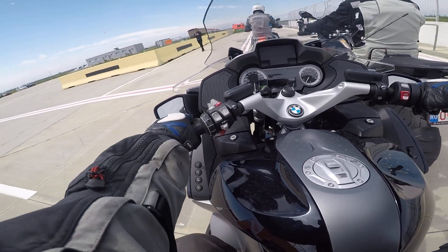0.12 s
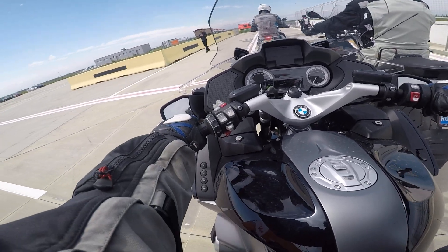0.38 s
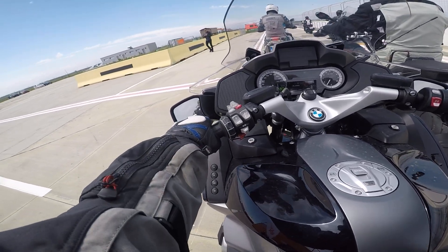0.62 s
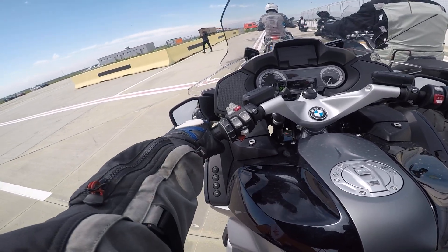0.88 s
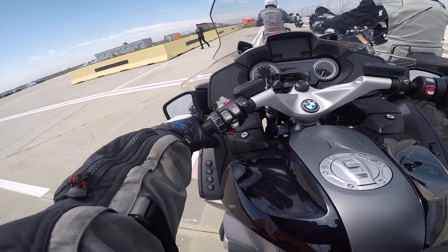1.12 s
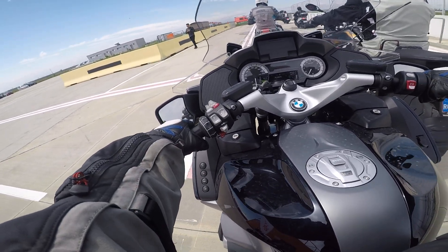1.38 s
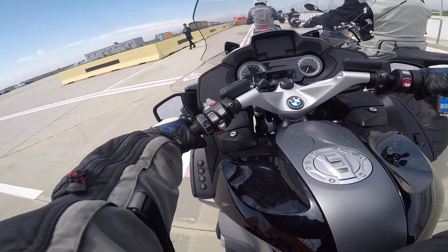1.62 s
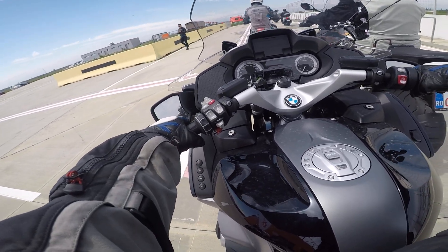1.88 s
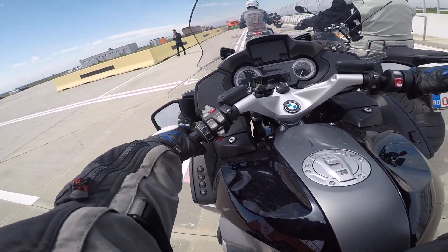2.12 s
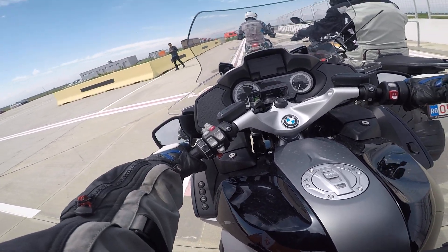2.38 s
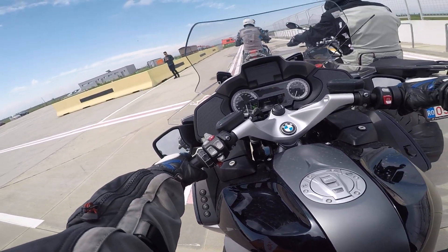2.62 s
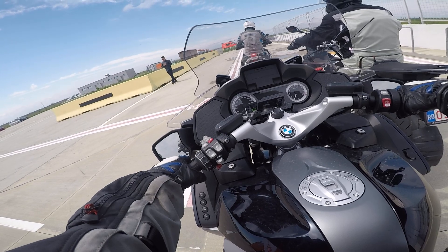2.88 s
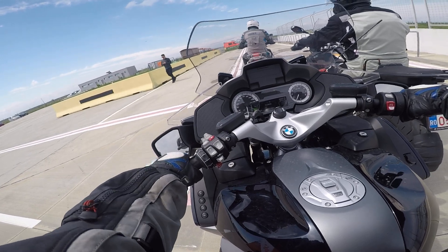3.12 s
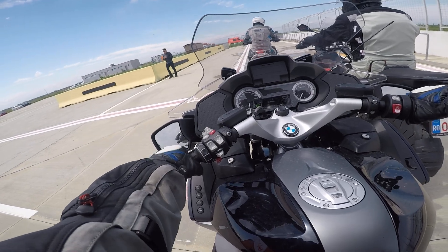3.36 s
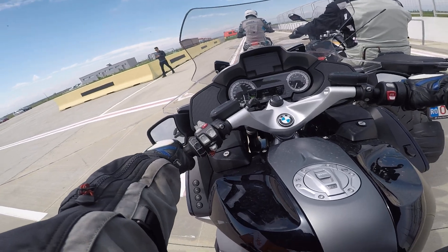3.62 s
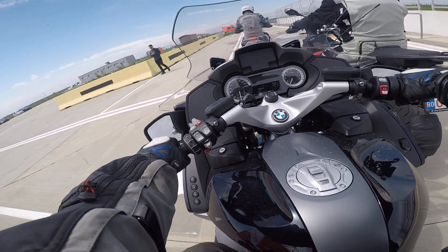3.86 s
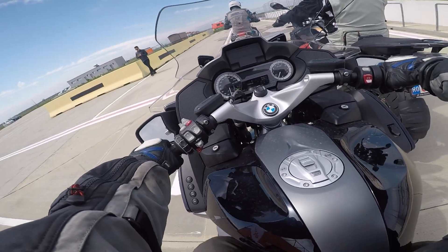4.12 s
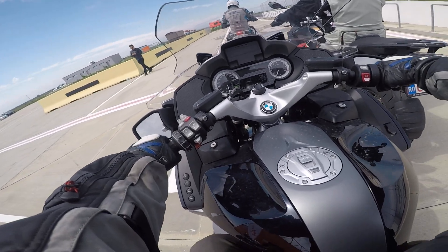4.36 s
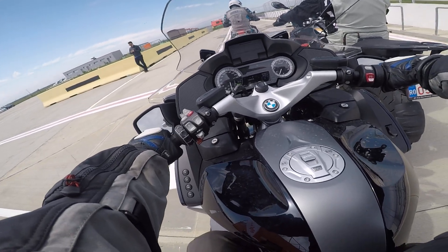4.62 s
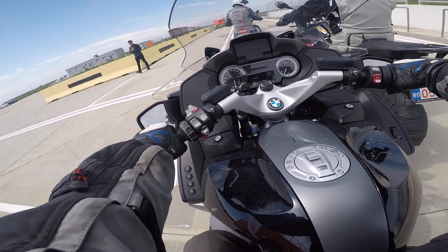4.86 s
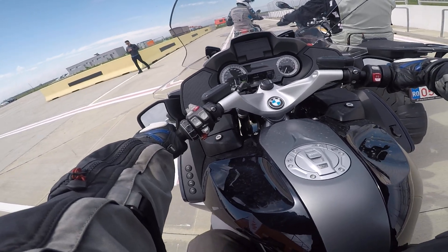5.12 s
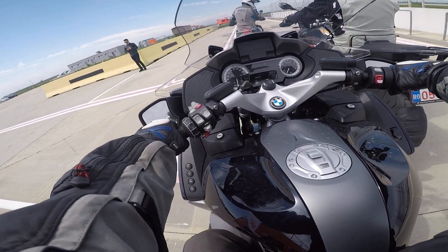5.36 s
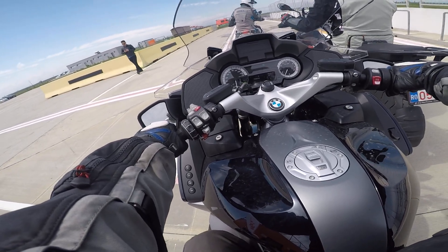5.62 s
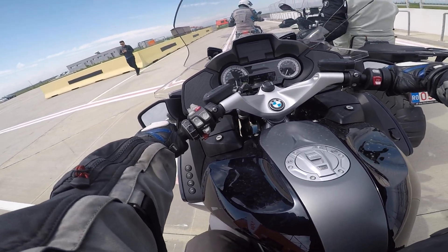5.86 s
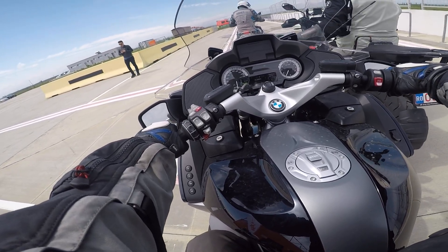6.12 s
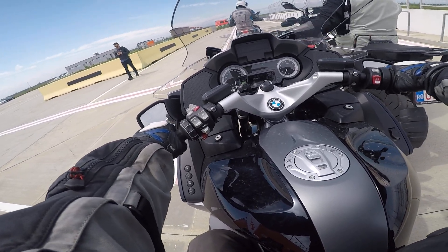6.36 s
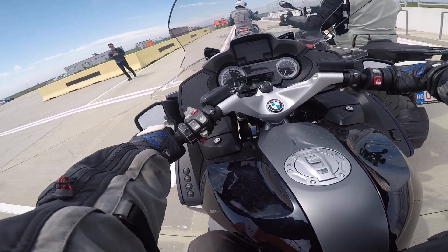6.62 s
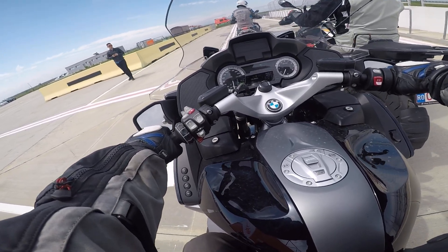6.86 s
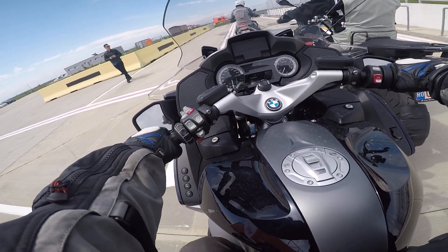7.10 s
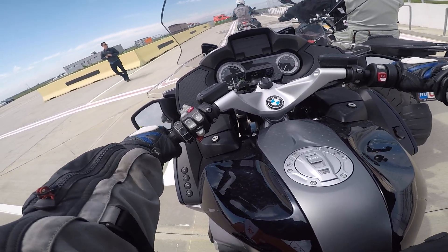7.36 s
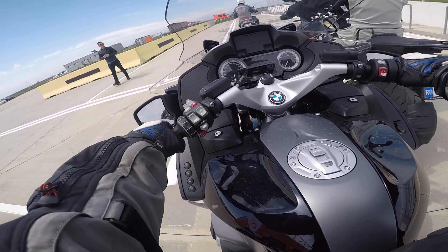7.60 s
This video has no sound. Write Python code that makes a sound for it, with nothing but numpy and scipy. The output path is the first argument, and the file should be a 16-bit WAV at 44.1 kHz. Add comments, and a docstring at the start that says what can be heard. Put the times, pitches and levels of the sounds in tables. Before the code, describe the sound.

Outdoors on a wide open apron, motorcycles idle in a queue around a chest-worn stereo microphone. A dense low chug dominates. Early on, metal scrapes and sharp lever clacks cut through; a neighbouring engine then blips gently and drops to a slower idle. Later a loose part rattles in a quick dying burst and a panel begins to buzz faintly. Far engines glide upward underneath, over a low rumble.

```python
"""The rider's own twin idles evenly: regular firing impulses excite its exhaust pipe and shake its casing.
Motorcycles wait in a queue around it on a wide apron, heard at two microphone ports on the rider's chest.
By the same principle a neighbour's engine lopes, blips and settles and a third idles ahead; a panel buzzes
as a modulated tone, a lever clacks and scrapes in its modes, and a loose part rattles in noise bursts.
Gliding tones are far machines, most winding up, over a crowd of shaped noise; gain control evens the level."""
import sys
import numpy as np
from scipy import signal
from scipy.fft import rfft, irfft, next_fast_len
from scipy.io import wavfile
from scipy.ndimage import uniform_filter1d, map_coordinates

SR = 44100
rng = np.random.default_rng(int(sys.argv[2]) if len(sys.argv) > 2 else 0)


def wav_record(signal):
    """Record a signal, one row per channel, as 16-bit PCM in the file named by sys.argv[1]."""
    frames = np.transpose(np.atleast_2d(signal))
    bounded = np.clip(frames, -1, 1)
    # unit amplitude maps onto the largest positive 16-bit level
    quanta = np.round(bounded * 32767).astype(np.int16)
    wavfile.write(sys.argv[1], SR, quanta)


def rack_gain(trim_db):
    """Turn a fader trim in dB into the linear factor to multiply a signal by."""
    fader = np.asarray(trim_db, float)
    return 10 ** (fader / 20)


N = 340893
TIME = np.arange(N) / SR  # s

# the neighbour's speed: fast idle, a sag, a blip, then down to slow idle: t/s, firing rate/Hz
NEIGHBOUR_RATE = [(0, 29.6), (.95, 29.1), (1.42, 26.8), (1.8, 29.45), (3.05, 28.8), (4.07, 31.6),
                  (4.27, 29.85), (4.68, 24.3), (4.9, 23), (5.3, 21.6), (5.7, 21.05), (7.73, 21.2)]


def own_engine():
    """Quasi-periodic excitation: a twin at idle fires almost evenly while its speed hunts slowly."""
    # exhaust pipe response: f/Hz, relative level/dB
    pipe = [(10, -45), (18, -19), (35, -4), (52, -15), (70, -7), (88, 0), (105, -5), (140, -10), (175, -6),
            (250, -16), (400, -26), (700, -40), (1500, -52), (6000, -80)]
    rate = 17.47 + 0.04 * wobble(1)  # firings per s
    drift_db = 2.5 * wobble(1.04)
    return engine(rate, -22.5 + drift_db, -39.5 + drift_db, pipe,
                  jitter=0.0003, scatter_db=0.8, uneven_db=1.1, burst=0.012)


def neighbour_engine():
    """Source and filter: the firing rate moves as the engine blips and settles, the pipe response stays."""
    # t/s, exhaust level/dB, clatter level/dB
    levels = [(0, -13.5, -33), (1.3, -14.5, -32.5), (1.6, -15, -51), (3, -20, -33.5), (3.8, -16.5, -38),
              (5.2, -15.5, -36.5), (7.73, -15.5, -34)]
    # exhaust pipe response: f/Hz, relative level/dB
    pipe = [(10, -56.5), (22, -33), (30, -25), (42, 0.5), (60, -5.5), (86, 3.5), (118, -3.5), (150, -6.5),
            (200, -11.5), (280, -19), (400, -25), (700, -44), (1500, -39.5), (6000, -70.5)]
    return engine(*curves(NEIGHBOUR_RATE), *curves(levels), pipe,
                  jitter=0.0004, scatter_db=1.2, uneven_db=1.1, burst=0.0065)


def third_engine():
    """Faster excitation: a four-cylinder engine up the queue, whose closer firings sound smoother."""
    # t/s, firing rate/Hz
    rate = [(0, 38.5), (1.6, 39.4), (2.5, 41.7), (7.73, 41.8)]
    # it takes load for a while: t/s, exhaust level/dB
    exhaust_level = [(0, -34), (1.7, -32), (2.4, -21.5), (3.3, -25), (3.8, -25.5), (7.73, -38)]
    # exhaust pipe response: f/Hz, relative level/dB
    pipe = [(10, -32), (40, 3), (80, -5), (120, -1.5), (165, -2), (250, -12.5), (400, -25.5), (700, -31.5),
            (6000, -76)]
    return engine(*curves(rate), *curves(exhaust_level), -48, pipe,
                  jitter=0.0006, scatter_db=1.5, uneven_db=2, burst=0.006)


def engine(rate, exhaust_db, clatter_db, pipe, jitter, scatter_db, uneven_db, burst):
    """Impulse excitation: firings drive the pipe and gate casing noise. Rows: direct, scattered."""
    spikes = firings(rate, jitter, scatter_db, uneven_db)
    exhaust = -unit(filtered(spikes, causal(pipe)))
    # each firing shakes the casing for a moment; burst is the time constant in s
    shake = filtered(spikes, lambda hz: 1 / (1 + 2j * np.pi * hz * burst) ** 2)
    clatter = unit(filtered(shake * rng.standard_normal((2, N)), casing))
    return rack_gain(exhaust_db) * exhaust + rack_gain(clatter_db) * clatter


def firings(rate, jitter, scatter_db, uneven_db):
    """Phase accumulation: a spike at each whole cycle, with random timing (jitter in s) and strength."""
    fired = np.flatnonzero(np.diff(np.floor(np.cumsum(rate) / SR)))
    luck = rng.standard_normal((400, 2))[:len(fired)]
    shift = np.round(jitter * SR * luck[:, 0]).astype(int)
    fired = np.clip(fired + shift, 0, N - 1)
    alternate = (-1) ** np.arange(len(fired))  # every second firing is weaker
    size = rack_gain(scatter_db * luck[:, 1] + uneven_db * alternate)
    return np.bincount(fired, size, N)


def casing(hz):
    """Resonance: narrow casing peaks stand on the broad colour of valve gear and casing noise."""
    # broad colour: f/Hz, relative level/dB
    broad = [(290, -14), (500, -3), (665, -8.5), (935, -9), (1020, -5.5), (1170, -10.5), (1610, -7.5),
             (1880, -13), (3770, -15.5), (4740, -20.5), (5950, -19), (7680, -25), (8250, -29),
             (12500, -42.5), (15000, -37)]
    # resonances on top of it: f/Hz, half-width/Hz, level over the broad colour/dB
    peaks = [(1007, 51, -14), (1706, 150, -6.5), (6480, 860, -6)]
    boost = sum(rack_gain(db) / (1 + ((hz - c) / w) ** 2) for c, w, db in peaks)
    return rack_gain(along(broad, hz)) * (1 + boost)


def buzz():
    """Forced vibration: the neighbour's firings modulate a panel's noisy tone in pitch and level."""
    # t/s, level/dB
    buzz_level = [(6.5, -52), (7.2, -44), (7.45, -46), (7.73, -44)]
    turns = np.pi * np.cumsum(curves(NEIGHBOUR_RATE)[0]) / SR  # one cycle per two firings
    turns = turns - turns[round(7.215 * SR)]  # a strong chirp falls at this second
    swell = unit(rack_gain(5 * np.cos(2 * turns) + 2 * np.cos(turns)))  # every second swell is larger
    hz = 3670 + 120 * np.sin(2 * turns) + 70 * wobble(4.2)  # pitch rises through each swell
    smooth = uniform_filter1d(rng.standard_normal((2, N)), size=150)
    fuzz = unit(uniform_filter1d(smooth, size=150))
    fade_in = np.clip((TIME - buzz_level[0][0]) / 0.4, 0, 1)
    tone = np.sqrt(2) * np.sin(2 * np.pi * np.cumsum(hz) / SR)
    return rack_gain(curves(buzz_level)[0]) * fade_in * swell * fuzz * tone


def clacks():
    """Modal impact: a lever rings in its damped modes with a noise crack on its front."""
    # t/s, level/dB, ring decay time t60/s, crack over ring/dB
    hits = [(1.397, -13, .029, -12), (1.4187, -21, .019, -15), (1.453, -8.5, .008, 2),
            (1.5042, -10, .0075, -2), (1.529, -22, .0073, 3)]
    # modes of the lever: f/Hz, relative level/dB
    lever = [(1350, -1), (1540, 6), (1850, -4), (2600, -6), (3900, -13)]
    total, t = np.zeros(N), np.arange(SR // 5) / SR
    for s, db, t60, crack_db in hits:
        modes = sum(rack_gain(level) * np.sin(2 * np.pi * hz * t) for hz, level in lever)
        ring = modes * rack_gain(-60 * t / max(t60, 0.005)) * (1 - np.exp(-t / 0.001))
        grit = uniform_filter1d(uniform_filter1d(rng.standard_normal(len(t)), size=5), size=5)
        band = grit - uniform_filter1d(grit, size=22)
        crack = rack_gain(crack_db - 60 * t / 0.029) * band
        total[round(s * SR):][:len(t)] += rack_gain(db) * (ring + crack)
    return total


def scrapes():
    """Friction excitation: grainy noise, fading through each stroke, drives a metal part's modes."""
    # t/s at start, t/s at end, level/dB
    strokes = [(1.125, 1.165, -42), (1.25, 1.325, -30), (1.392, 1.445, -30), (1.47, 1.485, -37)]
    # modes of the part: f/Hz, width/Hz, relative level/dB
    resonances = [(1320, 79, -6), (1570, 150, -2), (2550, 54, 0.5), (3200, 160, 1), (4800, 250, -4),
                  (6100, 220, -1.5), (7750, 200, -7.5), (8760, 180, -6), (4500, 2300, -17)]
    force = np.zeros(N)
    for start, end, db in strokes:
        fade_db = 5 * (TIME - start).clip(0, 1) / (end - start)
        gate = np.clip(np.minimum(TIME - start, end - TIME) / 0.007, 0, 1)
        force += rack_gain(db - fade_db) * gate

    def modes(f):
        return sum((-1) ** k * rack_gain(db) * 1j * f * w / (c * c - f * f + 1j * f * w)
                   for k, (c, w, db) in enumerate(resonances))
    grains = rng.standard_normal((2, N)) * rack_gain(1.4 * wobble(300))
    return force * unit(filtered(grains, modes))


def rattles():
    """Repeated contact: bursts of uneven noise from a loose part start at once and die away."""
    # t/s, bright level/dB, body level/dB, decay length/s
    bursts = [(6.4795, -20.5, -23, .02), (6.564, -26, -23, .024), (6.654, -32, -33, .016),
              (6.69, -37, -31, .012), (6.75, -38, -35, .014), (6.798, -35, -35, .012),
              (6.849, -45, -38, .014)]
    # bright colour: f/Hz, relative level/dB
    bright_tone = [(350, -36), (600, -1), (1200, -16), (2240, -8), (2600, -18), (3930, -7), (4930, -15.5),
                   (6330, -6), (8030, -24), (12000, -44), (15600, -76), (22000, -120)]
    # dull body colour: f/Hz, relative level/dB
    body_tone = [(200, -27), (400, 5), (800, -1), (1500, -6), (2800, -3), (4500, -35), (9000, -54),
                 (22000, -100)]
    bright, body = np.zeros((2, N))
    for s, bright_db, body_db, length in bursts:
        u = (TIME - s) / max(length, 0.004)
        force = np.clip(u / 0.065, 0, 1) * np.exp(-np.clip(u, 0, 5) ** 2)
        bright = bright + rack_gain(bright_db) * force
        body = body + rack_gain(body_db) * force
    contacts = rng.standard_normal((2, 2, N)) * rack_gain(2.1 * wobble(500))
    bright_noise = unit(filtered(contacts[0], causal(bright_tone)))
    body_noise = unit(filtered(contacts[1], causal(body_tone)))
    return bright * bright_noise + body * body_noise


def far_engines():
    """Frequency glide: each far engine is one exhaust tone, most of them rising as they wind up."""
    # one machine pulling away along the track, its strongest exhaust tone: t/s, f/Hz, level/dB
    away = [(2.15, 369, -36), (2.9, 385, -38), (3.15, 397, -33), (3.6, 418, -41), (4.0, 435, -37),
            (4.4, 463, -44), (4.9, 507, -39), (5.15, 530, -39), (5.4, 540, -47)]
    # others: t/s at start, t/s at end, f/Hz at start, f/Hz at middle, f/Hz at end, greatest level/dB
    tones = [(0.097, 0.648, 429, 440, 456, -33.5), (0.193, 0.702, 453, 478.6, 487, -37.5),
             (0.295, 1.701, 360, 380, 398, -38), (0.554, 1.1, 424.5, 437, 435, -32.5),
             (1.693, 2.497, 441, 457.4, 474.5, -36.5), (2.292, 3.6, 394, 413.3, 444.7, -37.5),
             (2.393, 3.2, 350.5, 361.6, 371, -38), (3.198, 3.7, 351, 349, 351, -35.5),
             (3.949, 5.602, 342, 374, 357.8, -33.5), (4.198, 5.502, 310.7, 337.3, 363, -34),
             (4.7, 5.35, 323, 327.4, 331, -37), (5.41, 5.9, 449, 437, 417, -45),
             (6.349, 7.591, 340, 363.6, 390, -37), (6.595, 7.7, 399.4, 414, 441, -39.5)]
    total = glide(away[0][0], away[-1][0], *curves(away))
    for start, end, first, middle, last, db in tones:
        u = np.clip(2 * (TIME - start) / (end - start) - 1, -1, 1)  # -1 at start, 1 at end
        bend = (first + last) / 2 - middle
        hz = middle + u * (last - first) / 2 + u ** 2 * bend
        total += glide(start, end, hz, db - 2 * (u + 0.3) ** 2)  # loudest a little before halfway
    return total


def glide(start, end, hz, db):
    """Propagation through moving air: level and phase of an exhaust tone flutter between its fades."""
    heard = np.clip(np.minimum(TIME - start, end - TIME) / 0.089, 0, 1)
    phase = 2 * np.pi * np.cumsum(hz) / SR + 0.38 * wobble(9.9)
    return heard * rack_gain(db + 2 * wobble(5)) * np.sqrt(2) * np.sin(phase)


def crowd():
    """Incoherent sum: engines too many and far to tell apart become noise. Rows: direct, scattered."""
    # engines and traffic, slowly thinning out: t/s, rumble level/dB, roar level/dB, hiss level/dB
    levels = [(0, -16, -25.5, -29.5), (1.7, -15.5, -32, -31), (3.1, -14.5, -30.5, -31),
              (5.8, -15.5, -42, -32.5), (7.73, -18, -38.5, -31.5)]
    # low rumble: f/Hz, relative level/dB
    rumble_tone = [(8.8, -39), (15, -16), (70, -5), (102, -2), (183, -6), (258, -12.5), (301, -19),
                   (520, -35), (639, -39.5), (900, -42), (1170, -62), (1980, -120)]
    # roar of engines under load on the track: f/Hz, relative level/dB
    roar_tone = [(150, -59), (260, -4), (380, -1), (520, -6.5), (680, -18), (1100, -58)]
    rumble_db, roar_db, hiss_db = curves(levels)
    rumble = unit(filtered(rng.standard_normal((2, N)), lambda hz: rack_gain(along(rumble_tone, hz))))
    roar = unit(filtered(rng.standard_normal((2, N)), lambda hz: rack_gain(along(roar_tone, hz))))
    # the hiss is patchy in time and frequency
    z = signal.stft(rng.standard_normal((2, N)), nperseg=512)[2]
    patches = uniform_filter1d(uniform_filter1d(rng.standard_normal(z.shape[1:]), 10, 0), 6, 1)
    patchy = signal.istft(z * rack_gain(0.71 * unit(patches)), nperseg=512)[1][:, :N]
    hiss = unit(filtered(patchy, casing))
    hiss_db = hiss_db + 0.24 * wobble(14)
    return rack_gain(rumble_db) * rumble + rack_gain(roar_db) * roar + rack_gain(hiss_db) * hiss


def ports(direct, scattered):
    """Partial coherence: two ports share direct sound, differ in that scattered by tank, screen, rider."""
    # f/Hz, left-right likeness (1 = identical)
    alike = [(60, 1), (110, 1), (200, 0.99), (370, 1), (690, 0.65), (1270, 0.18), (2340, 0.67),
             (4320, 0.84), (7950, 0.26), (14600, 0.01)]
    # f/Hz, left over right level/dB
    lean = [(60, 1.0), (110, 1.5), (200, 3.0), (370, 3.5), (690, -0.5), (1270, -6.0), (2340, -2.0),
            (4320, -1.0), (7950, 3.0), (14600, 0.5)]
    # f/Hz, left phase lead/rad
    lead = [(0, 0), (430, -0.2), (780, -1.5), (1550, 1.4), (2670, -0.5), (3100, -0.0), (5600, -0.3),
            (7320, -1.6), (8790, -0.9), (10500, 3.2), (12800, -0.4), (13700, 0.0), (14500, -0.2),
            (14800, 1.7)]
    t = np.arange(SR // 20) / SR
    echoes = rng.standard_normal(len(t)) * rack_gain(-60 * t / 0.024)
    side = np.array([[1], [-1]])  # left, right

    def smear(hz):  # phase of the echoes alone, at even strength
        return np.exp(1j * np.angle(rfft(echoes, 2 * len(hz) - 2)))

    def angle(hz):  # shares out direct and scattered sound
        return np.arccos(np.clip(along(alike, hz), 0, 1)) / 2

    def port(hz):
        return rack_gain(side * along(lean, hz) / 2) * np.exp(0.5j * side * along(lead, hz))
    shared = filtered(direct, lambda hz: port(hz) * np.cos(angle(hz)))
    differing = filtered(scattered, lambda hz: port(hz) * side * np.sin(angle(hz)) * smear(hz))
    return shared + differing


def unit(x):
    """Normalisation: scaled to rms 1."""
    return x / np.sqrt(np.mean(x ** 2) + 1e-20)


def along(points, hz):
    """Logarithmic frequency scale: (f/Hz, value) points read between on a log axis."""
    f, v = np.transpose(points)
    return np.interp(np.log(hz + 1), np.log(f + 1), v)


def curves(rows):
    """Linear interpolation in time: one value per sample for each column after t/s."""
    s, *cols = np.transpose(rows)
    return [np.interp(TIME, s, c) for c in cols]


def wobble(rate):
    """Band-limited fluctuation: a smooth random curve, rate knots a second."""
    knots = rng.standard_normal(int(N * rate / SR) + 4)
    return map_coordinates(knots, [TIME * rate])


def filtered(x, response):
    """Convolution theorem: the spectrum of x times a complex response of frequency."""
    m = 2 * next_fast_len(N // 2 + SR // 2)
    return irfft(rfft(x, m) * response(np.fft.rfftfreq(m, 1 / SR)), m)[..., :N]


def causal(points):
    """Minimum phase: the response with these (f/Hz, level/dB) gains that rings only after it is struck."""
    def response(hz):
        cepstrum = irfft(np.log(rack_gain(along(points, hz))))
        cepstrum[1:len(hz) - 1] *= 2
        cepstrum[len(hz):] = 0
        return np.exp(rfft(cepstrum))
    return response


def scene():
    """Superposition: everything on the apron adds up and reaches the two ports."""
    engines = own_engine() + neighbour_engine() + third_engine()
    handling = clacks() + scrapes() + rattles()
    direct, scattered = engines + buzz() + handling + far_engines() + crowd()
    return ports(direct, scattered)


def roll_off(x):
    """The treble ends steeply here."""
    return signal.sosfilt(signal.butter(12, 15240, fs=SR, output="sos"), x)


def record(dry):
    """Compression: gain falls as smoothed power rises; peaks are softly limited, top treble rolled off."""
    power = filtered(np.mean(dry ** 2, 0), lambda hz: 1 / (1 + 2j * np.pi * hz * 0.014))  # 14 ms
    # well above the knee each further dB of level comes out as 0.4 dB
    held = rack_gain(2.0) * dry * (1 + np.abs(power) / rack_gain(-29)) ** -0.3
    limited = held / (1 + np.abs(held / 0.98) ** 4) ** (1 / 4)
    finished = filtered(limited, lambda hz: 1 / (1 + (hz / 13500) ** 12))
    return roll_off(finished)


dry = scene()
out = record(dry)
wav_record(out)
```